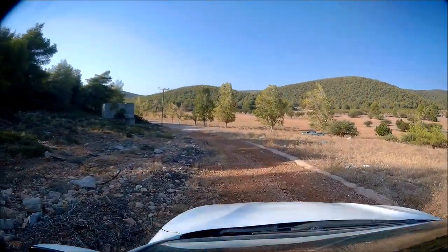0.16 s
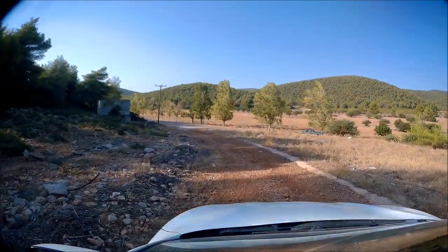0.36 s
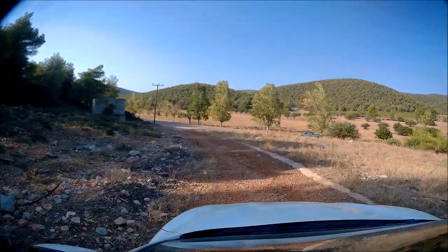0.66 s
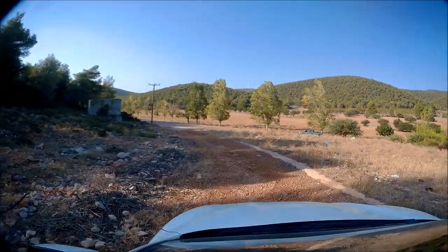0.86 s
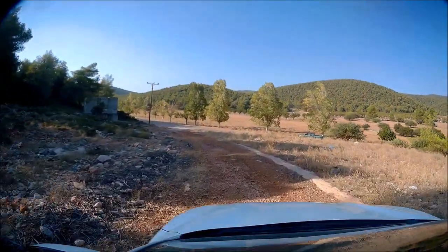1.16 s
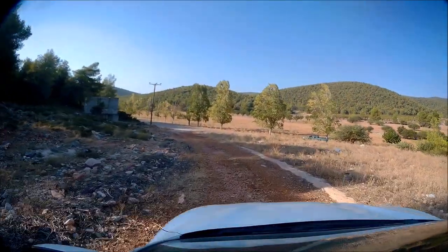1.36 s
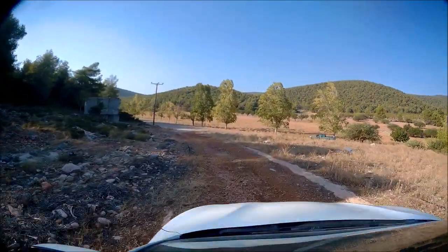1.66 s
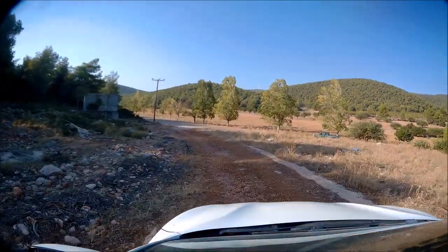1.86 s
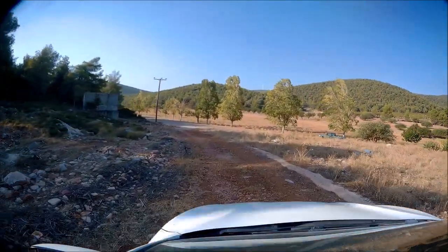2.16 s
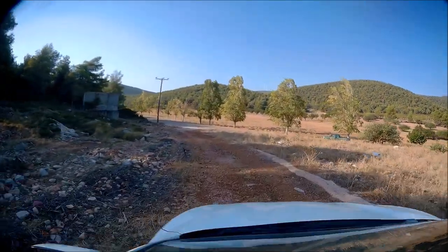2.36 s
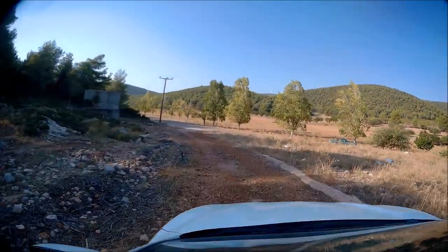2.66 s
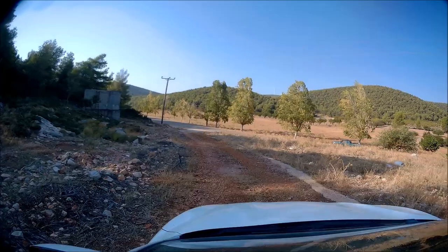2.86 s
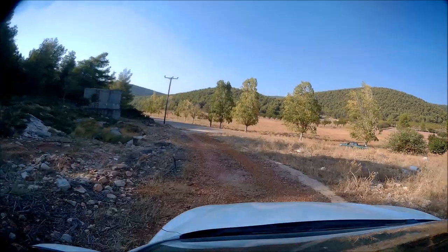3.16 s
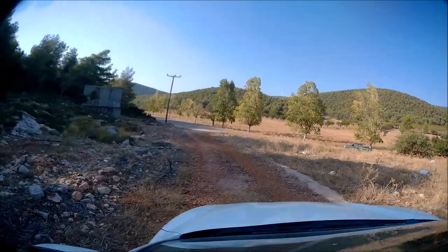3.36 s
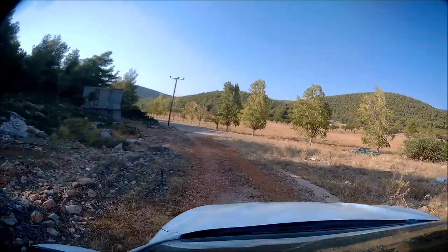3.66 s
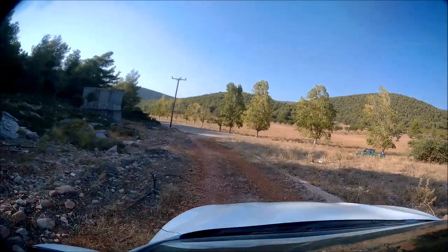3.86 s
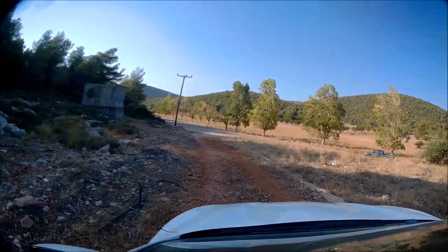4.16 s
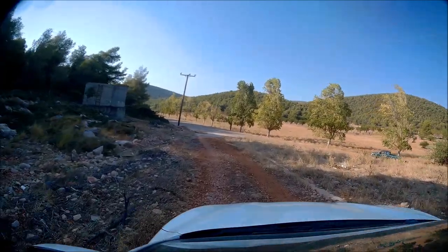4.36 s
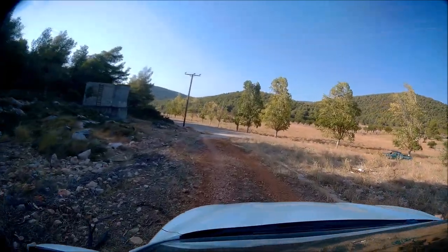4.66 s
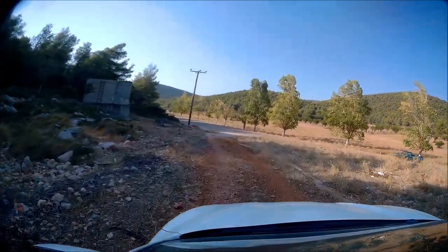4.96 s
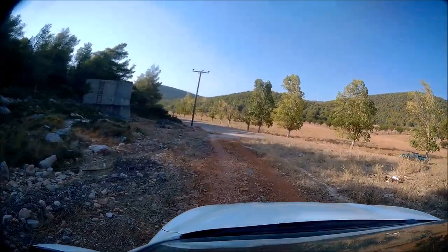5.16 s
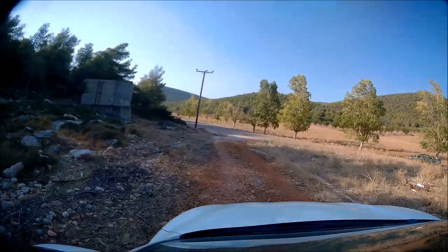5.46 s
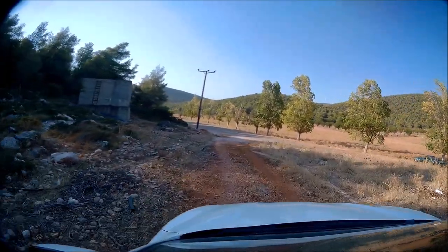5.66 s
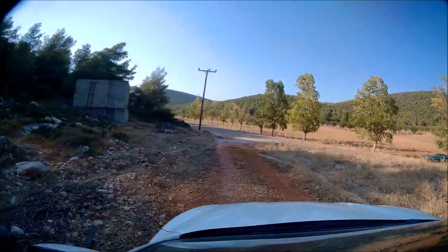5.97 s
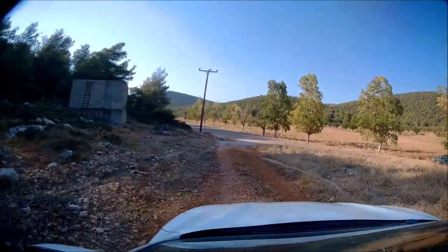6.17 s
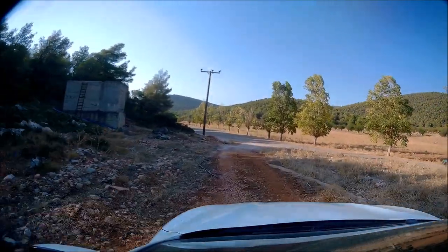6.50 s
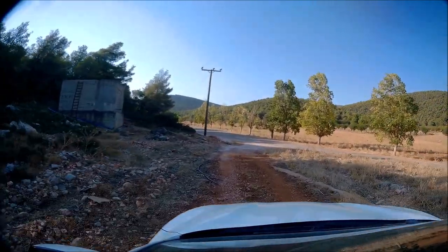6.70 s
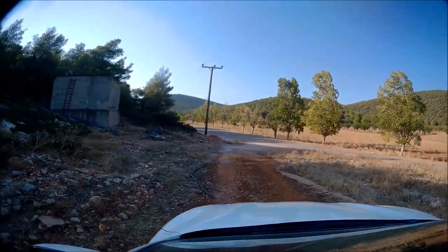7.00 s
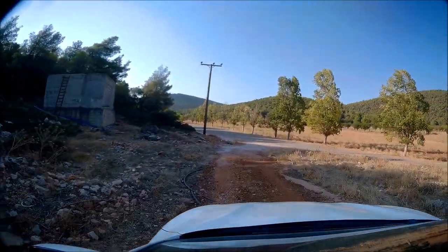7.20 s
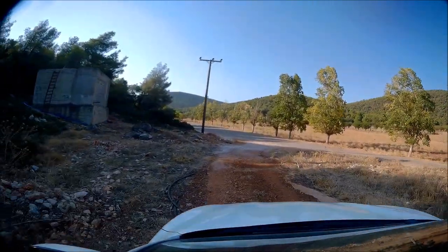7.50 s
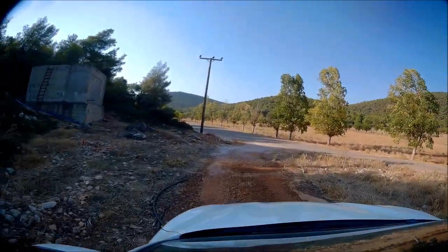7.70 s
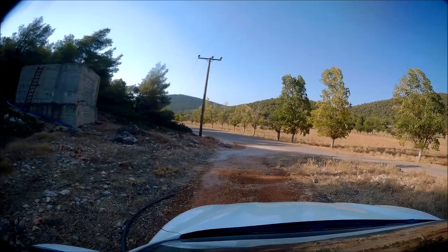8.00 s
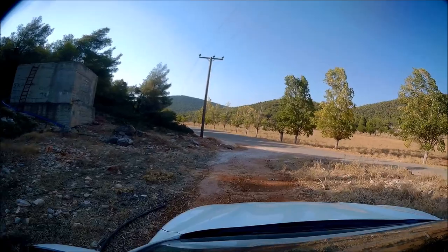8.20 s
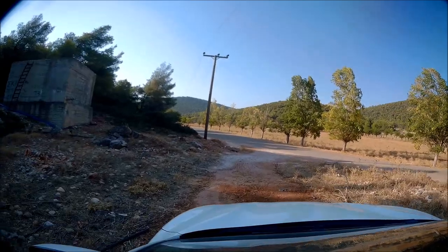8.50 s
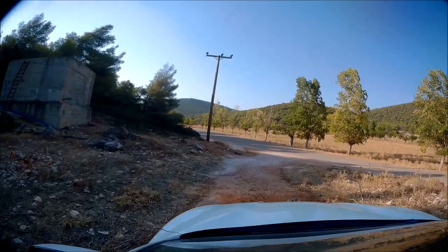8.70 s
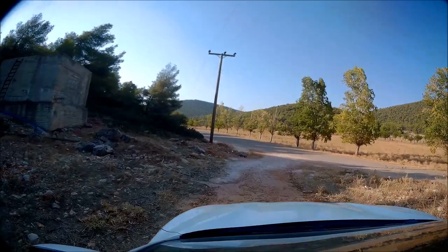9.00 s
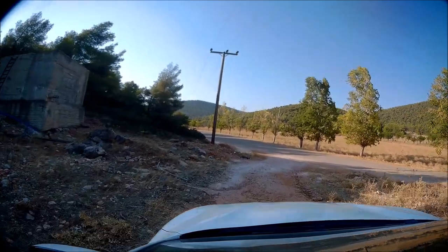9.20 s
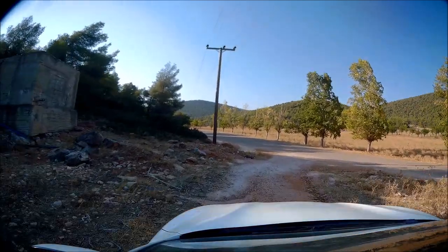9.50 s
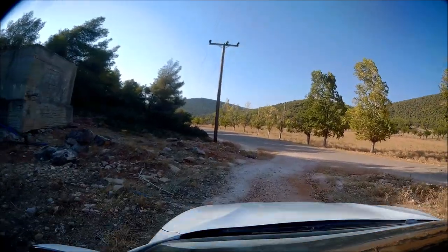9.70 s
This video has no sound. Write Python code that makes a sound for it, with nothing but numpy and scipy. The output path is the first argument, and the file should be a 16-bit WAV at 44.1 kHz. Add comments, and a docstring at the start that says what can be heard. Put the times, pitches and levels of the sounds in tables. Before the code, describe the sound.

A car rolls slowly over a rocky dirt track. Pebbles crunch and clatter in irregular spurts, ruts rumble through the suspension, and larger stones snap from under the tyres into the boomy body. A few chips crack sharply on metal. The engine drones low, revs slightly, then eases down. The body-mounted microphone catches dull, close knocks, small falling ticks and faint hiss.

```python
"""Engine hum of a car creeping over gravel near idle: firing tone and overtones shaped by body booms.
Filtered noise gives drivetrain whirr and rut rumble; random impulses through colours give crunch, clatter, grit.
Tabled stones, chips, clacks and buried rocks ring the body; engine and loose gravel sounds fade as the car slows.
The mount of the cased camera fixed to the body ticks in falling sweeps and the case clicks.
Faint microphone hiss and electronic whine lie underneath."""
import sys
import numpy as np
from scipy import signal
from scipy.fft import rfft, irfft, next_fast_len
from scipy.io import wavfile
from scipy.ndimage import map_coordinates

SR = 44100
rng = np.random.default_rng(int(sys.argv[2]) if len(sys.argv) > 2 else 0)


def waveform_to_disk(signal):
    """Save audio, clipped to [-1, 1], as 16-bit WAV at the path in sys.argv[1]."""
    frames = np.transpose(np.atleast_2d(signal))
    scaled = np.clip(frames, -1, 1) * 32767
    samples = np.round(scaled).astype(np.int16)
    wavfile.write(sys.argv[1], SR, samples)


N = 434385
TIME = np.arange(N) / SR
TAPS = 4096
BINS_HZ = np.fft.rfftfreq(TAPS, 1 / SR)
RING_WIDTH_HZ = 115
LEAD_S = .003  # delay of a knock's peak, room for its attack


def gain_of(db):
    """Decibels to an amplitude factor."""
    return 10 ** (np.asarray(db) / 20)


def evened(x):
    """Scales to an rms of 1."""
    return x / np.sqrt(np.mean(x ** 2) + 1e-20)


def read(colour, hz):
    """A colour in dB at the given frequencies, interpolated over log frequency."""
    point_hz, point_db = np.transpose(colour)
    return np.interp(np.log(hz + 1), np.log(point_hz + 1), point_db)


def curves(rows):
    """Each column of a table after the first, sample by sample."""
    s, *columns = np.transpose(rows)
    return [np.interp(TIME, s, column) for column in columns]


def add(mix, start_s, sound):
    """Mixes a sound in at a time."""
    part = mix[max(round(start_s * SR), 0):][:len(sound)]
    part += sound[:len(part)]


def noise(colour):
    """Steady noise of a colour, rms 1."""
    size = next_fast_len(N)
    gain = gain_of(read(colour, np.fft.rfftfreq(size, 1 / SR)))
    return evened(irfft(rfft(rng.standard_normal(size)) * gain, size)[:N])


def drift(per_s):
    """Smooth random curve through per_s knots a second, rms 1."""
    knots = rng.standard_normal(4096)
    coarse_s = TIME[::64]
    wander = map_coordinates(knots, [coarse_s * per_s], mode="wrap")
    return evened(np.interp(TIME, coarse_s, wander))


def blow(db, lag_s=0):
    """Minimum-phase response with this spectrum, each frequency delayed by lag_s; peak 1."""
    log_gain = np.log(gain_of(np.maximum(db, db.max() - 100)))
    mirrored = np.r_[log_gain, log_gain[-2:0:-1]]
    phase = -signal.hilbert(mirrored).imag[:len(db)]
    # group delay integrates to phase
    phase = phase - 2 * np.pi * np.cumsum(lag_s * np.ones(len(db))) * BINS_HZ[1]
    wave = irfft(np.exp(log_gain + 1j * phase))
    return wave / abs(wave).max()


def ringing(colour, ring_hz, ring_db):
    """A colour in dB with a resonance raised at ring_hz."""
    return read(colour, BINS_HZ) + ring_db / (1 + ((BINS_HZ - ring_hz) / RING_WIDTH_HZ) ** 2)


# car body's response to a stone: hz, level_db
BODY_COLOUR = [(30, -25), (120, -16.5), (220, -7.5), (340, -8.5), (450, 1.5), (560, -1), (660, -15),
               (760, -20.5), (880, -13), (1050, -24), (1500, -45), (6000, -92)]


def knock(ring_hz, ring_db, contact_hz):
    """One stone: the struck spot rings in the body's colour; the tyre's rubber rounds the attack."""
    wave = blow(ringing(BODY_COLOUR, ring_hz, ring_db), LEAD_S)
    wave = irfft(rfft(wave) * np.exp(-(BINS_HZ / contact_hz) ** 4))
    return wave / abs(wave).max()


def impacts(per_s, spread_db, most):
    """Random impulses of either sign, many small and a few large."""
    size = gain_of(spread_db * np.minimum(rng.exponential(1, N), most))
    return size * rng.choice([-1, 1], N) * (rng.random(N) < per_s / SR)


def panels(x, wet_db, t60_s):
    """Body panels shiver after each blow: a decaying noise tail from 6 ms on."""
    t = np.arange(SR // 4) / SR
    tail = rng.standard_normal(len(t)) * gain_of(-60 * t / t60_s) * (t > .006)
    return x + gain_of(wet_db) * signal.oaconvolve(x, tail / np.linalg.norm(tail))[:N]


def spurts(per_s, decay_s, share):
    """Gravel gives way in fits, quick to rise and slower to die; share is their part of the power."""
    starts = rng.random(N) < per_s / SR
    power = signal.lfilter([1], [1, -np.exp(-1 / (decay_s * SR))], starts)
    rise = np.hanning(round(.005 * SR))  # 5 ms
    power = abs(signal.oaconvolve(power, rise, "same"))
    return np.sqrt(1 - share + share * power / power.mean())


def swells(rows):
    """Amplitude that rises, holds and eases over each stretch; overlaps add in power."""
    ramp = 0.14  # share of the length, at each end
    power = np.zeros(N)
    for start_s, length_s, level_db in rows:
        shape = np.interp((TIME - start_s) / length_s, [0, ramp, 1 - ramp, 1], [0, 1, 1, 0])
        power += (gain_of(level_db) * shape) ** 2
    return np.sqrt(power)


# engine speed, in low gear also the car's pace: time_s, firing_hz
ENGINE_SPEED = [(0.0, 52.6), (0.45, 53.3), (0.75, 55.0), (1.05, 54.6), (1.25, 56.2), (1.6, 56.0),
                (1.97, 53.8), (2.25, 54.7), (2.8, 53.0), (3.4, 50.3), (4.05, 49.3), (4.5, 49.8),
                (4.9, 52.0), (5.55, 58.1), (6.25, 60.8), (6.5, 60.9), (7.15, 56.8), (8.1, 51.5),
                (8.75, 48.8), (9.25, 45.8), (9.85, 43.8)]


def firing_rate():
    """Firings a second, sample by sample."""
    return curves(ENGINE_SPEED)[0]


def pace():
    """Car speed in octaves above its cruising crawl, at 54 firings a second."""
    return np.log2(firing_rate() / 54)


# depth of loose gravel: time_s, level_db (before loose_share)
LOOSE_GRAVEL = [(0, 1.5), (0.8, -2), (3.0, -2), (3.45, 1), (4.3, 2), (5.1, 3.5), (5.85, 0.5), (6.2, -3.5),
                (7.1, -0.5), (8.2, 0.5), (8.5, -4.5)]


def rolling(db_per_octave, loose_share):
    """Tyre sound level in dB: up with speed and with gravel depth."""
    loose_db, = curves(LOOSE_GRAVEL)
    return db_per_octave * pace() + loose_share * loose_db


# ruts and bumps a wheel rolls through: start_s, length_s, rumble_db
RUT_EVENTS = [(0.041, 0.082, -34.5), (0.226, 0.11, -37), (0.906, 0.14, -38), (1.049, 0.096, -36.5),
              (1.54, 0.15, -32), (1.65, 0.15, -35), (2.085, 0.38, -45.5), (2.62, 0.042, -39.5),
              (3.397, 0.096, -41.5), (4.96, 0.1, -37), (5.125, 0.21, -42.5), (5.68, 0.26, -39.5),
              (6.229, 0.19, -38.5), (6.435, 0.12, -34.5), (6.57, 0.16, -38), (6.72, 0.12, -35)]


def jolts():
    """Strength of the shaking as wheels roll through ruts."""
    return swells(RUT_EVENTS)


# body booms met by firing tone and overtones: hz, level_db (at cruise)
BODY_BOOMS = [(42, -44), (54, -44), (58, -45.5), (62, -53.5), (90, -54.5), (104, -48.5), (120, -47),
              (135, -56.5), (154, -53), (168, -59.5), (183, -53), (200, -52), (220, -49), (232, -53),
              (265, -51), (450, -56.5), (520, -52.5), (580, -52), (640, -71)]
# overtones, the last the alternator's whine: firing_multiple, level_db
OVERTONES = [(2, 0), (3, 0), (4, 1), (5, -4), (10.53, 1)]


def engine(db_per_octave=15, firing_db=-.5, uneven=0.043, rough=0.12, half_db=-15):
    """Firing tone, rougher overtones, half orders of unequal cylinders, alternator; swells with speed."""
    firing_hz = firing_rate()
    turns = np.cumsum(firing_hz) / SR + .004 * drift(7.8)  # slight phase jitter
    firing_gain = gain_of(firing_db + read(BODY_BOOMS, firing_hz))
    hum = firing_gain * np.sin(2 * np.pi * turns) * (1 + uneven * drift(25))
    half_orders = [(k + .5, half_db) for k in range(1, 5)]
    for multiple, level_db in OVERTONES + half_orders:
        level = gain_of(level_db + read(BODY_BOOMS, multiple * firing_hz))
        tone = np.sin(2 * np.pi * (multiple * turns + rng.random()))
        hum += level * tone * (1 + rough * drift(14))
    return np.sqrt(2) * gain_of(db_per_octave * pace()) * hum


# drivetrain noise colour: hz, level_db
WHIRR_COLOUR = [(15, -13), (70, 6.5), (130, -5), (350, -17), (520, 5), (590, -6.5), (680, -16.5),
                (780, -17.5), (880, -7), (1000, -18.5), (1400, -21.5), (4000, -61.5)]


def drivetrain(level_db=-55, throb=0.23):
    """Gears and belts whirr at a level independent of speed, pulsing with each firing."""
    pulse = np.sin(2 * np.pi * np.cumsum(firing_rate()) / SR)
    return gain_of(level_db) * noise(WHIRR_COLOUR) * (1 + throb * pulse)


def gravel(level_db=-44.5, db_per_octave=17, rut_db=-6):
    """Pebbles shift under the treads in spurts, more in ruts, knocking at six pitches."""
    pebbles = np.zeros(N)
    for ring_hz in np.linspace(280, 600, num=6):
        stone = knock(ring_hz, ring_db=8, contact_hz=1610)
        hits = signal.oaconvolve(impacts(per_s=36, spread_db=4.5, most=2.31), stone)[:N]
        pebbles += evened(panels(hits, wet_db=-9.5, t60_s=0.095))
    steady = gain_of(level_db + rolling(db_per_octave, loose_share=0.96))
    crunch = np.hypot(steady, gain_of(rut_db) * jolts())
    return crunch * spurts(per_s=45, decay_s=0.016, share=0.56) * evened(pebbles)


# small stones striking each other: hz, level_db
CLATTER_COLOUR = [(250, -28.5), (500, -6.5), (620, 3.5), (740, 4.5), (900, 2), (1050, -14), (1350, -20),
                  (5000, -64.5)]
# hard stones clacking together: time_s, peak_db
CLACK_EVENTS = [(0.181, -35.5), (3.625, -34.5), (4.137, -37.5), (4.862, -39), (5.159, -32.5),
                (5.813, -33.5), (6.588, -34.5), (7.024, -33.5)]


def clatter(level_db=-58.0, db_per_octave=7, per_s=24, spread_db=6.5):
    """Small hard stones click under four wheels, louder on deep gravel; a few clack loudly."""
    click = blow(read(CLATTER_COLOUR, BINS_HZ))
    wheels = np.zeros(N)
    for _ in range(4):
        clicks = signal.oaconvolve(impacts(per_s, spread_db, most=2.2), click)[:N]
        wheels += panels(clicks, wet_db=-2.0, t60_s=0.036)
    out = gain_of(level_db + rolling(db_per_octave, loose_share=1.1)) * evened(wheels)
    for time_s, peak_db in CLACK_EVENTS:
        add(out, time_s, gain_of(peak_db) * click)
    return out


# suspension rumble: hz, level_db
RUMBLE_COLOUR = [(10, -13.5), (25, -6), (70, 1.5), (120, -1.5), (165, -2.5), (300, -1), (420, -6.5),
                 (600, -11), (900, -37), (6000, -100)]


def ruts(level_db=-44.0, db_per_octave=17, lumpy_db=2.5):
    """Uneven ground shakes the suspension all the time, and hard in each rut."""
    rumble = np.hypot(gain_of(level_db + rolling(db_per_octave, loose_share=.5)), jolts())
    return rumble * gain_of(lumpy_db * drift(30)) * noise(RUMBLE_COLOUR)


# airborne grain colour: hz, level_db
SPRAY_COLOUR = [(500, -15), (1400, -4.5), (1800, 1.5), (3250, 1), (3900, -4.5), (5000, -8.5), (9000, -26.5)]
# tread scuffing through loose sand: start_s, length_s, level_db
SCUFF_EVENTS = [(0.9, 0.2, -80), (3.32, 0.26, -79.5), (5.0, 0.26, -77), (5.5, 0.48, -79)]


def grit(level_db=-79.0, db_per_octave=5):
    """Sand and chips crackle through the air in small spurts, more where a tread scuffs."""
    grain = blow(read(SPRAY_COLOUR, BINS_HZ))
    grains = signal.oaconvolve(impacts(per_s=700, spread_db=2.5, most=3.4), grain)[:N]
    steady = gain_of(level_db + rolling(db_per_octave, loose_share=0.27))
    level = np.hypot(steady, swells(SCUFF_EVENTS))
    return level * evened(grains * spurts(per_s=40, decay_s=.012, share=.45))


# body's response through the suspension: hz, level_db
THUD_COLOUR = [(30, -26), (90, -8), (170, 4.5), (300, -0.5), (480, 6.5), (580, -12.5), (700, -20),
               (900, -23), (1300, -45), (6000, -90)]
# tyre blows on buried rocks: time_s, peak_db (before panel shiver), ring_hz
THUMP_EVENTS = [(0.092, -32, 328), (1.086, -25, 390), (1.572, -21, 420), (1.593, -18.5, 340),
                (1.611, -24, 350), (1.64, -21.5, 300), (1.757, -26, 398), (2.637, -26, 430),
                (4.491, -26.5, 295), (6.243, -27, 240), (6.452, -21.5, 330), (6.463, -23.5, 200),
                (6.748, -27, 300), (6.802, -23.5, 390)]


def thumps(wet_db=-9.5):
    """A tyre lands on half-buried rocks: dull blows up through the suspension."""
    out = np.zeros(N)
    for time_s, peak_db, ring_hz in THUMP_EVENTS:
        thud = blow(ringing(THUD_COLOUR, ring_hz, ring_db=7))
        add(out, time_s, gain_of(peak_db) * thud)
    return panels(out, wet_db, t60_s=0.058)


# larger stones popping from under a tyre: time_s, peak_db (before panel shiver), ring_hz
STONE_EVENTS = [(0.108, -27.5, 430), (0.407, -21, 452), (0.522, -27.5, 513), (0.564, -23.5, 424),
                (0.979, -27.5, 515), (1.151, -22.5, 517), (1.228, -32, 500), (1.767, -25.5, 525),
                (2.357, -23, 380), (3.012, -18.5, 500), (3.036, -25, 436), (3.335, -28.5, 451),
                (3.395, -24.5, 560), (3.403, -28, 554), (3.625, -25, 460), (3.711, -27.5, 473),
                (4.138, -31, 475), (4.391, -32, 490), (4.623, -27, 477), (4.724, -26.5, 460),
                (4.779, -28.5, 490), (4.85, -21.5, 466), (4.923, -28, 480), (5.004, -25.5, 520),
                (5.132, -25, 470), (5.175, -27, 475), (5.2, -28, 463), (5.268, -22.5, 480),
                (5.515, -29, 457), (5.609, -28, 386), (6.131, -16, 486), (6.865, -26.5, 540),
                (6.872, -26, 503), (7.024, -27.5, 570), (7.153, -29, 500), (7.196, -22, 507),
                (7.384, -28.5, 540), (7.516, -23, 526), (7.581, -24, 517), (7.617, -17.5, 440),
                (7.626, -29, 422), (7.835, -30, 500), (8.121, -28.5, 480), (8.294, -28, 475),
                (8.32, -28.5, 495), (8.611, -30, 453), (9.102, -30, 497)]
# chip on bare metal: hz, level_db
CRACK_COLOUR = [(100, 7), (270, 16), (500, 22.5), (750, 5.5), (1000, -1.5), (1230, -2), (1520, -27),
                (1780, -14), (2030, -44), (2280, -18), (2560, -35.5), (2850, -15.5), (3130, -41),
                (3420, -18), (3750, -39), (4300, -47.5), (9000, -82.5)]
# chips hitting the underbody: time_s, peak_db (before panel shiver)
CHIP_EVENTS = [(2.6261, -17), (3.915, -31), (3.9433, -29), (5.27, -25.5), (6.162, -25), (7.118, -38),
               (7.1977, -32), (7.518, -25), (7.681, -26.5)]


def stones(delay_s=0.0011):
    """Squeezed stones snap free and thump the car; a few chips fly up and crack on the metal."""
    out = np.zeros(N)
    crack = blow(read(CRACK_COLOUR, BINS_HZ))
    for time_s, peak_db, ring_hz in STONE_EVENTS:
        pop = knock(ring_hz, ring_db=8.0, contact_hz=1270)
        add(out, time_s + delay_s - LEAD_S, gain_of(peak_db) * pop)
    for time_s, peak_db in CHIP_EVENTS:
        add(out, time_s, gain_of(peak_db) * crack)
    return panels(out, wet_db=-12.0, t60_s=0.11)


# mount modes: hz, level_db (before random variation)
MOUNT_COLOUR = [(200, -10), (700, -3), (1300, -22), (1620, -2), (1860, -8), (2110, 2.5), (2400, -9.5),
                (2700, -17), (3200, -5), (3750, -17), (4300, -17), (5300, -39), (12000, -66)]
# mount ticks: time_s, peak_db (first slip), brightness_db_per_octave (2-5 kHz)
TICK_EVENTS = [(0.3969, -50.5, 0), (1.043, -64, 3), (1.1319, -43, -1), (1.593, -54, -2), (1.595, -47.5, 3),
               (1.829, -47, -3), (2.2513, -52, 1), (2.3474, -49, 4), (2.593, -56, -2), (3.158, -52.5, 2),
               (3.991, -43.5, 4), (5.0445, -60, 3), (5.075, -62, 1), (5.1973, -59, 9), (5.3804, -42, -5),
               (6.0733, -45.5, 0), (6.4868, -49.5, 8), (6.6365, -59, -3), (6.8965, -53.5, -1),
               (7.5151, -51.5, -3), (8.1558, -59, 2), (8.6898, -51.5, -8), (8.9285, -57, 3),
               (9.6228, -44.5, 2)]
# ring after a tick: hz (raised 0-4 % at random), level_db (re tick), t60_s
RING_MODES = [(760, -2, .05), (2000, -13, .03)]
# case clicks: hz, level_db
CASE_COLOUR = [(1000, -17), (4000, -22), (5300, 8), (6300, -9), (7600, 15), (8800, -29), (14000, -36)]
# clearer case clicks: time_s, peak_db
CLICK_EVENTS = [(2.52, -61), (5.7646, -62), (6.3075, -60)]


def mount(case_db=-67, vary_db=1.5, travel_s=.0058, reslip_s=.002, reslip_share=.18):
    """Mount slips: treble bending waves outrun low ones, so ticks sweep down and ring; the case clicks."""
    out = np.zeros(N)
    t = np.arange(TAPS) / SR
    lag_s = travel_s * np.sqrt(1000 / np.maximum(BINS_HZ, 300))
    for time_s, peak_db, bright_db in TICK_EVENTS:
        spot = []
        for hz, level_db in MOUNT_COLOUR:
            tilt_db = bright_db * np.log2(np.clip(hz, 2000, 5000) / 2000)
            # each slip favours other modes
            spot.append((hz, level_db + tilt_db + vary_db * rng.standard_normal()))
        tick = gain_of(peak_db) * blow(read(spot, BINS_HZ), lag_s * rng.uniform(.9, 0.96))
        start_s = time_s - travel_s / 2
        add(out, start_s, tick)
        # weaker second slip
        add(out, start_s + reslip_s * rng.random(), reslip_share * tick)
        for hz, ring_db, t60_s in RING_MODES:
            decay = gain_of(peak_db + ring_db - 60 * t / t60_s)
            ring = decay * np.sin(2 * np.pi * hz * rng.uniform(1.0, 1.04) * t)
            add(out, start_s + travel_s, ring)
    case_click = blow(read(CASE_COLOUR, BINS_HZ))
    faint_clicks = [(time_s, case_db) for time_s in rng.uniform(0, N / SR, size=9)]
    for time_s, peak_db in CLICK_EVENTS + faint_clicks:
        add(out, time_s, gain_of(peak_db) * case_click)
    return panels(out, wet_db=-18, t60_s=.025)


def scene():
    """Everything that reaches the camera, one channel."""
    rolling_car = engine() + drivetrain() + gravel() + clatter() + ruts() + grit()
    return (rolling_car + thumps() + stones() + mount())[None]


# microphone hiss: hz, level_db
HISS_COLOUR = [(100, 6), (2000, 4.5), (8000, .5), (13000, 0), (16000, -3)]
# thin whine of the electronics: hz, level_db (rms)
WHINE_TONES = [(12780, -100), (12877, -101)]


def record(dry, hiss_db=-77.5, edge_hz=15400):
    """Adds hiss and a phase-wandering electronic whine, then low-passes everything."""
    whine = np.zeros(N)
    for hz, level_db in WHINE_TONES:
        phase = 2 * np.pi * hz * TIME + .6 * drift(10)
        whine += np.sqrt(2) * gain_of(level_db) * np.sin(phase)
    sound = dry + gain_of(hiss_db) * noise(HISS_COLOUR) + whine
    low_pass = signal.firwin(511, edge_hz, window=("kaiser", 9), fs=SR)
    return signal.oaconvolve(sound, low_pass[None], "same")


dry = scene()
out = record(dry)
waveform_to_disk(out)
```